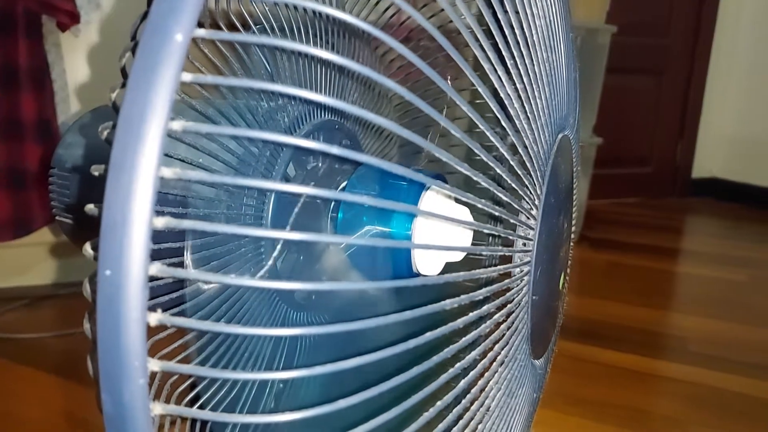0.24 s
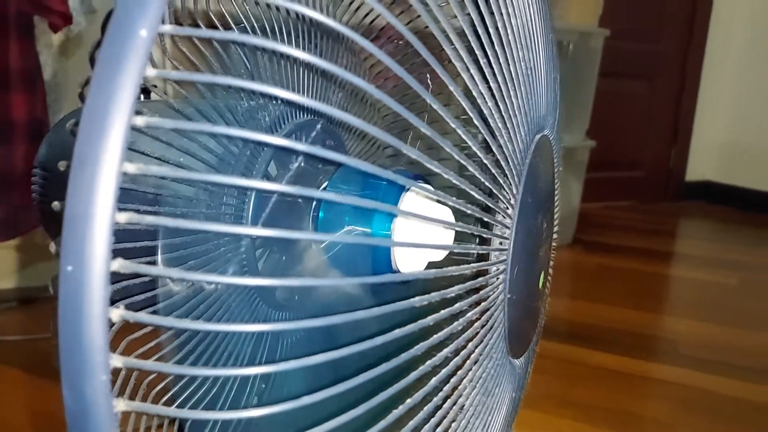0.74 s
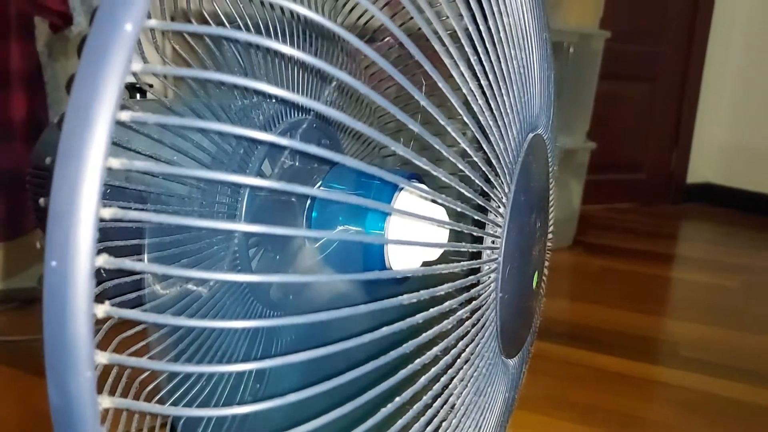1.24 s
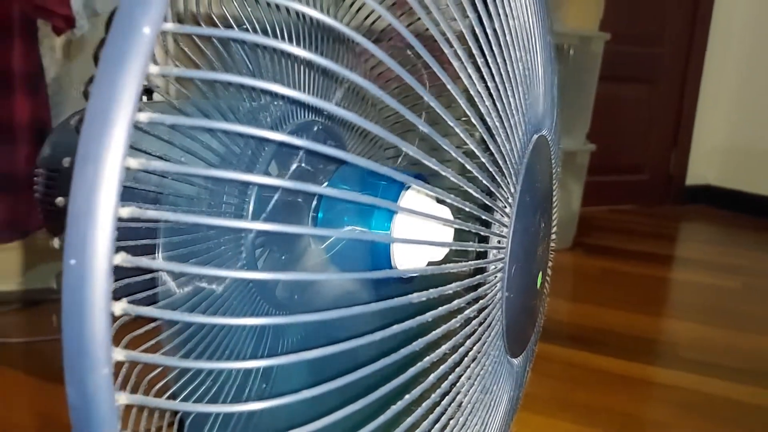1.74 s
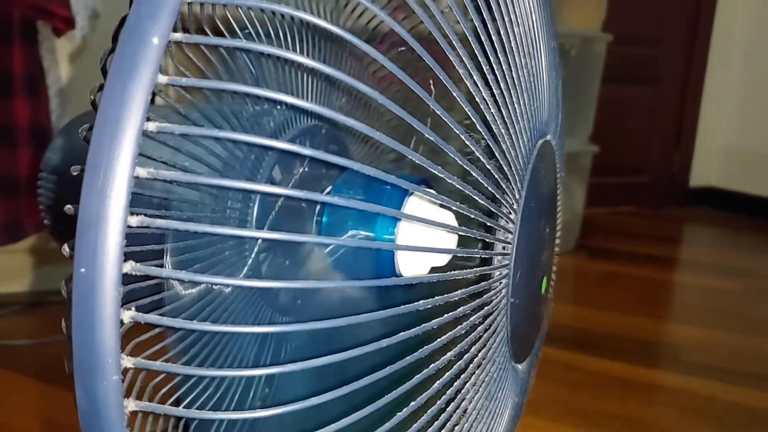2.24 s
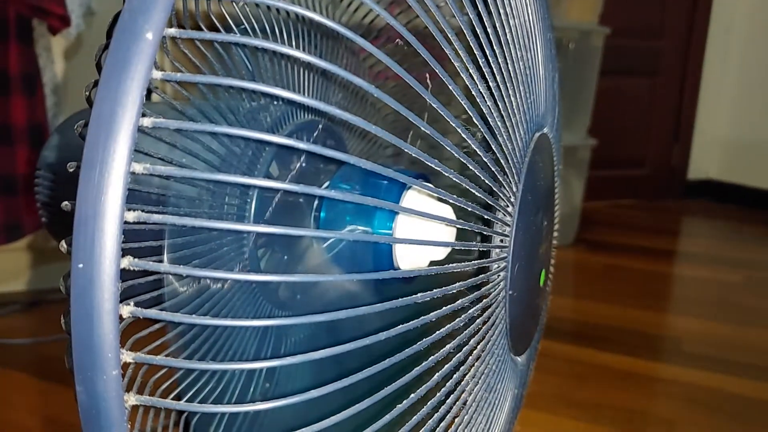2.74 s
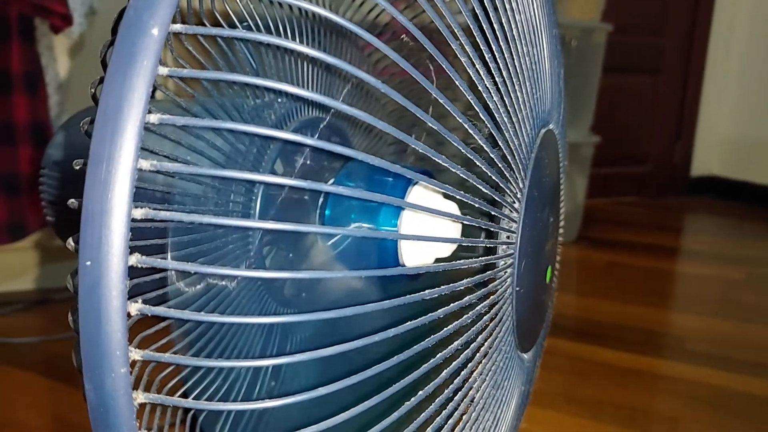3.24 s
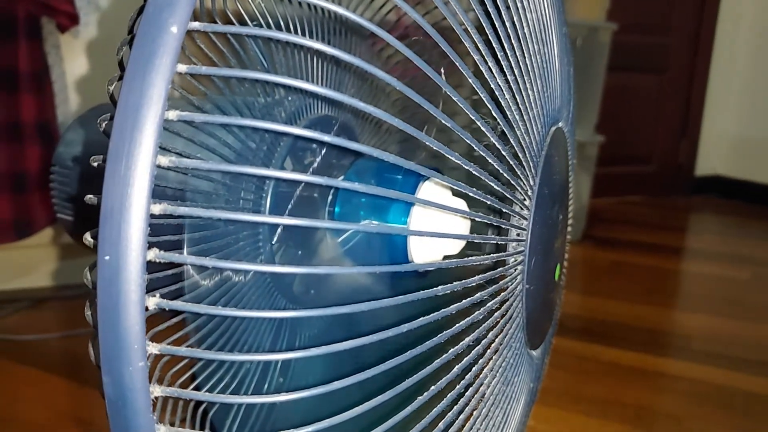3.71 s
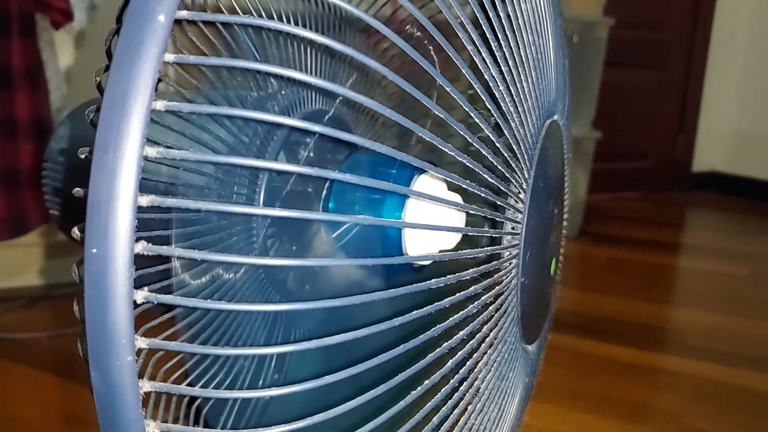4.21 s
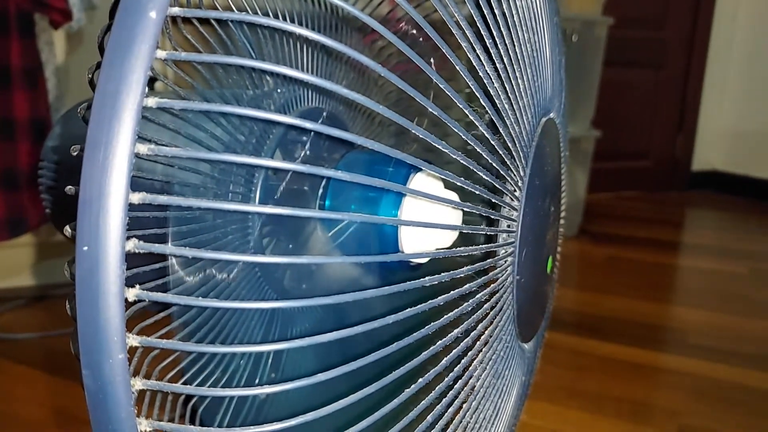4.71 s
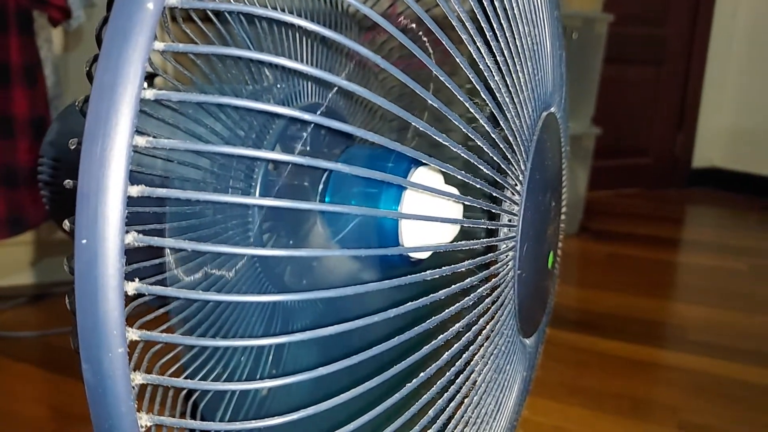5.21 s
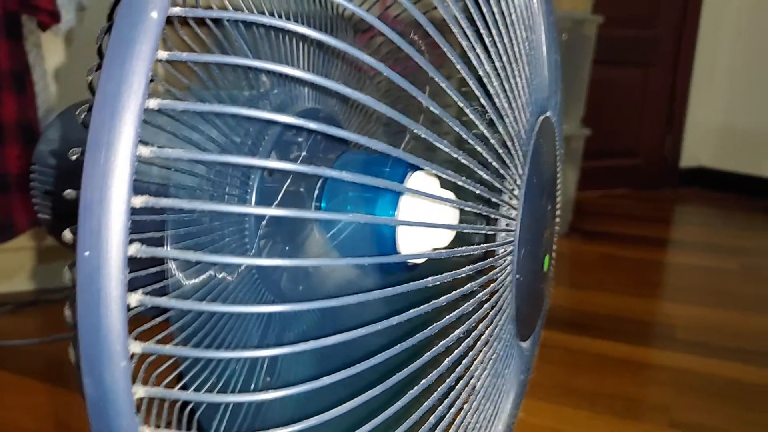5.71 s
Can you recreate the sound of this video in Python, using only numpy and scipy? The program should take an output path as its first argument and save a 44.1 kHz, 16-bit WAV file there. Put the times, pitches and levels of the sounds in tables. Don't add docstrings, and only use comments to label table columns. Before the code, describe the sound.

Close, steady electric fan: low motor hum, fluttering blades and soft dark airflow, with slight shudders and tiny handling ticks.

```python
import sys
import numpy as np
from scipy import signal
from scipy.io import wavfile

SR = 44100
rng = np.random.default_rng(int(sys.argv[2]) if len(sys.argv) > 2 else 0)


def invert_db(x):
    u = np.asarray(x, float) / 20
    return 10 ** u


def inscribe(sig):
    pcm = np.round(np.clip(np.atleast_2d(sig).T, -1, 1) * 32767)
    wavfile.write(sys.argv[1], SR, pcm.astype(np.int16))


N = 262836
T = np.arange(N) / SR

MAINS_HZ, SHAFT_HZ = 49.982, 16.616
BLADES, SLOTS = 3, 31

# time_s, grip_shift (0-1), lean_to_fan (0-1)
GRIP = [(0, 0.21, 0), (1, 0.22, 0.23), (1.9, 0.26, 0.24), (2.15, .15, 0.6), (2.7, 0.24, 1), (3.28, 0.14, 1),
        (3.42, 1, 0.66), (4.0, 1, 0.6), (4.2, 0.9, 0.1), (4.6, .95, 0), (4.8, .95, 0.54), (5.3, 0.93, 1),
        (5.96, 0.96, 1)]


def evened(x):
    return x / np.sqrt(np.mean(x ** 2) + 1e-20)


def read(points, hz):
    f, *columns = np.transpose(points)
    return np.squeeze([np.interp(np.log(hz + 1), np.log(f + 1), c) for c in columns])


def follow(rows, t):
    s, *columns = np.transpose(rows)
    return np.squeeze([np.interp(t, s, c) for c in columns])


def held(rest_db, shift_db, lean_db):
    shift, lean = follow(GRIP, T)
    return rest_db + shift_db * shift + lean_db * lean


def drift(rate_hz):
    rates_hz = rate_hz * np.linspace(0.1, 1, num=12)
    return evened(sum(np.sin(2 * np.pi * (f * T + rng.random())) for f in rates_hz))


def tone(hz, db, pan_db, lead_rad, waver_db, waver_rad=0, start_rad=None):
    if start_rad is None:
        start_rad = rng.uniform(0, 2 * np.pi)
    phase = 2 * np.pi * hz * T + start_rad + waver_rad * drift(3)
    level = np.sqrt(2) * invert_db(db + waver_db * drift(5))
    left = invert_db(pan_db / 2) * np.cos(phase + lead_rad / 2)
    right = invert_db(-pan_db / 2) * np.cos(phase - lead_rad / 2)
    return level * np.array([left, right])


def noise(size, db_of, same=0, lead_rad=0):
    hz = np.fft.rfftfreq(size, 1 / SR)
    t = np.arange(4 * N // size + 5) * size / 4 / SR
    a, b, c, d = rng.standard_normal((len(t), len(hz), 4)).T
    left = a + 1j * b
    right = same * left * np.exp(-1j * lead_rad) + np.sqrt(1 - same ** 2) * (c + 1j * d)
    spectra = np.array([left, right]) * invert_db(db_of(hz[:, None], t))
    return evened(signal.istft(spectra, nperseg=size, noverlap=size * 3 // 4)[1][:, :N])


def motor():
    # mains_multiple, level_db, left_right_db
    overtones = [(4, -63, 8.5), (6, -71.5, -4.5)]
    # slot_rate_multiple, added_mains_multiple, level_db
    whine = [(1, -4, -75), (1, -2, -73), (1, 0, -62.5), (1, 2, -65.5), (1, 4, -72), (2, -6, -70),
             (2, -4, -71), (3, 0, -84), (5, -10, -90)]
    hum_db, hum_pan_db = held(-41.5, 2, 1.5), held(-2.5, -3, 1.5)
    out = tone(2 * MAINS_HZ, hum_db, hum_pan_db, 0.14, waver_db=0.15, start_rad=0.25)
    for k, db, pan_db in overtones:
        out += tone(k * MAINS_HZ, db, pan_db, 0.1, waver_db=2)
    slot_hz = SLOTS * SHAFT_HZ
    for k, m, db in whine:
        out += tone(k * slot_hz + m * MAINS_HZ, db, 0, 0, waver_db=2, waver_rad=0.5)
    return out


def blades():
    beat_db, beat_pan_db = held(-46, 3, -3), held(3.3, 5.5, 3.5)
    return tone(BLADES * SHAFT_HZ, beat_db, beat_pan_db, 0.6, waver_db=0.15, start_rad=0.4)


def air():
    # freq_hz, density_db_per_hz
    colour = [(15, -9.5), (30, -5), (62, 3.5), (130, 2), (185, -5.5), (330, -4), (460, -5), (600, -2),
              (900, -4), (1200, -7.5), (1900, -14), (2300, -21), (3500, -33), (6000, -59.5)]
    # freq_hz, width_hz, gain_db
    body = [(133, 45, 2.5), (152, 21, 1.5), (233, 26, 5.5), (321, 19, -5), (540, 9.8, 3.5),
            (552.3, 18, 6.5), (620, 53, 1), (696, 41, -2), (760, 40, -2), (835, 70, 1.5), (1090, 72, -3.5),
            (1411, 85, -9.5), (1510, 150, 0.5), (1677, 140, 3), (1793, 120, -4), (2164, 91, -3.5)]
    # freq_hz, likeness (0-1)
    likeness = [(30, .6), (60, .65), (130, .75), (300, .72), (550, .79), (850, .72), (1250, .64),
                (1600, .56), (2000, .45), (2400, .25), (3200, .3)]
    # freq_hz, lead_rad
    port_lead = [(300, 0), (900, .15), (1300, .7), (1650, 1.2), (1900, 2.2), (2300, .8), (3300, 2.4)]
    # freq_hz, balance_db
    tilt = [(60, -1.6), (300, -1.6), (550, 1.1), (1000, -1.7), (1700, -1.5), (2400, -1.2)]
    # freq_hz, left_db, right_db
    uncover = [(150, 0, -0.5), (300, 0, 2), (560, 0.96, 0.5), (786, .5, 2), (1110, 0.67, 3), (1700, 1, 7),
               (1980, .5, 3.5), (2190, -0.74, -0.5)]
    size = 4096
    bins_hz = np.fft.rfftfreq(size, 1 / SR)[:, None]

    def colour_db(hz, t):
        db = read(colour, hz)
        for f, w, g in body:
            db = db + g / (1 + (2 * (hz[:, 0] - f) / w) ** 2)
        balance_db = np.outer([0.5, -0.5], read(tilt, hz))
        shift = follow(GRIP, t)[0]
        return (db + balance_db)[:, :, None] + read(uncover, hz)[:, :, None] * shift

    same = np.clip(read(likeness, bins_hz), 0, 1)[:, None]
    rush = noise(size, colour_db, same, read(port_lead, bins_hz)[:, None])
    return invert_db(held(-54.5, 1.5, 0.38) + 4.5 + 0.62 * drift(12)) * rush


def stand():
    # peak_s, mains_multiple, length_s, peak_db
    shudders = [(.35, 3, .4, -56), (0.913, 3, 0.47, -54.5), (1.555, 3, 0.36, -60), (2.11, 3, 0.13, -55),
                (2.422, 3, .15, -54), (2.85, 3, 0.41, -54.5), (3.344, 3, .1, -50.5), (3.7, 3, 0.49, -53.5),
                (4.456, 3, 0.52, -53.5), (5.4, 3, 0.24, -58.5), (0.144, 5, 0.28, -64.5),
                (0.576, 5, 0.13, -60.5), (.85, 5, 0.28, -64.5), (1.81, 5, 0.24, -60.5),
                (2.62, 5, 0.85, -62.5), (3.226, 5, 0.11, -62), (3.557, 5, 0.26, -63),
                (4.068, 5, 0.069, -56), (4.29, 5, 0.2, -59.5), (4.73, 5, 0.13, -57), (5.268, 5, 0.29, -57),
                (5.752, 5, 0.54, -59)]

    def swell(k):
        out = invert_db(-71)
        for s, m, length_s, db in shudders:
            if round(m) == k:
                out = out + invert_db(db) * np.exp(-(2 * (T - s) / length_s) ** 2)
        return out

    third = tone(3 * MAINS_HZ, -1.5, -0.7, 0.5, waver_db=0.7, waver_rad=0.8)
    fifth = tone(5 * MAINS_HZ, -1.5, -4.5, -0.1, waver_db=1.6, waver_rad=0.6)
    return swell(3) * third + swell(5) * fifth


def hub():
    # freq_hz, width_hz, level_db
    rub_bands = [(4900, 1600, -86), (7200, 1800, -87), (11000, 4000, -96)]

    def colour_db(hz, t):
        power = sum(invert_db(2 * g) / (1 + (2 * (hz - f) / w) ** 4) for f, w, g in rub_bands)
        return 10 * np.log10(power) + 0 * t

    angle = 2 * np.pi * (SHAFT_HZ * T - 0.39)
    touch = np.exp(4.5 * (np.cos(angle) - 1)) + 0.3 * np.exp(4.5 * (-np.cos(angle) - 1))
    pressure = invert_db(1.2 * drift(4))
    return invert_db([[-75.5], [-79.5]]) * pressure * touch * noise(512, colour_db)


def knocks():
    # start_s, peak_db, pitch_hz, t60_s
    hits = [
        (2.252, -62, 4700, .012),
        (2.505, -51, 5000, .006),
        (2.584, -63, 8600, .009),
        (2.81, -44, 66, .16),
        (3.31, -52, 145, .1),
    ]
    out = np.zeros(N)
    for s, db, hz, t60_s in hits:
        u = np.maximum(T - s, 0)
        out += invert_db(db - 60 * u / t60_s) * np.tanh(9.7 * u / t60_s) * np.sin(2 * np.pi * hz * u)
    return out


def hiss():
    # freq_hz, density_db_per_hz
    hiss_colour = [(1530, -26.5), (2600, -3.5), (3380, -2.5), (3780, -5.5), (4870, -6), (6460, -11.5),
                   (7270, -11), (7900, -14), (9900, -17), (10250, -19), (11200, -16.5), (13700, -15.5),
                   (15500, -15)]
    grain = noise(1024, lambda hz, t: read(hiss_colour, hz)[:, None] + 0 * t)
    return invert_db(-72) * grain * invert_db([[-0.3], [0.3]])


def drone():
    return tone(37.5, held(-60.5, -21, -1), 1.2, 0, waver_db=2)


def scene():
    return motor() + blades() + air() + stand() + hub() + knocks() + hiss() + drone()


def roll_off(x):
    return signal.sosfilt(signal.butter(12, 15750, fs=SR, output="sos"), x)


def record(dry):
    return roll_off(dry)


dry = scene()
out = record(dry)
inscribe(out)
```